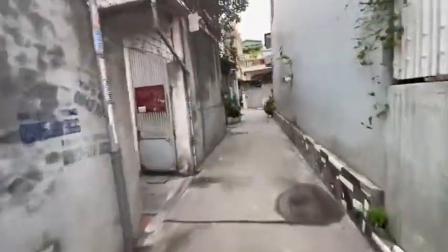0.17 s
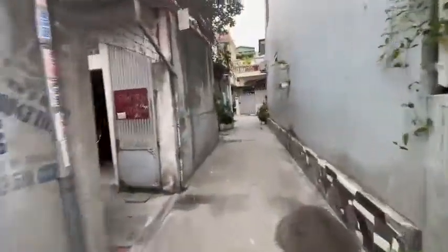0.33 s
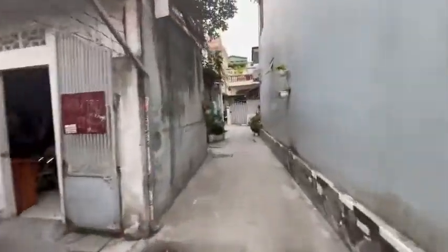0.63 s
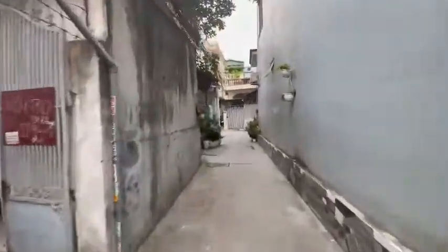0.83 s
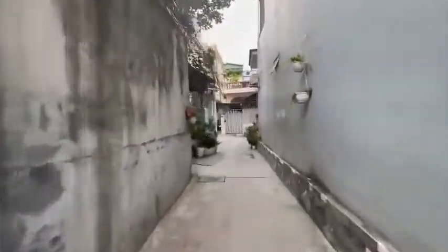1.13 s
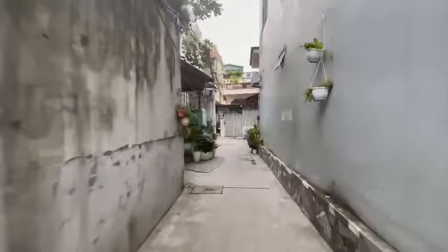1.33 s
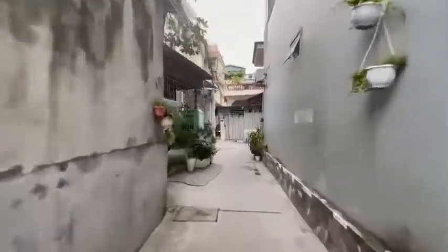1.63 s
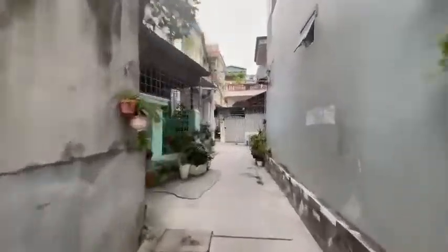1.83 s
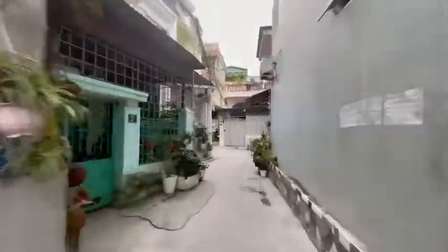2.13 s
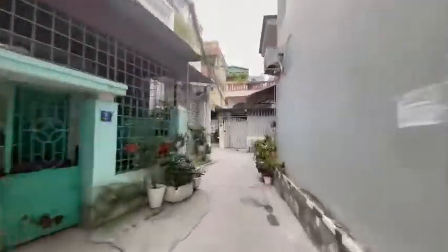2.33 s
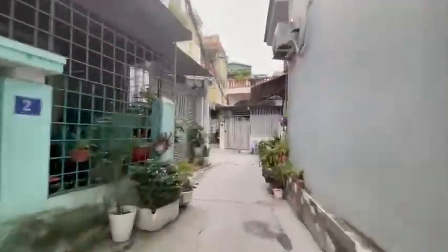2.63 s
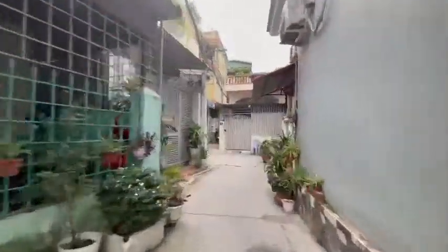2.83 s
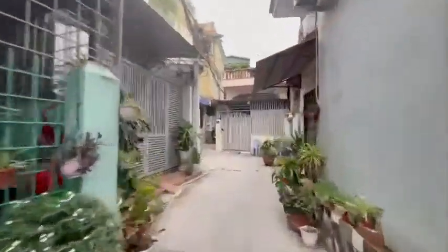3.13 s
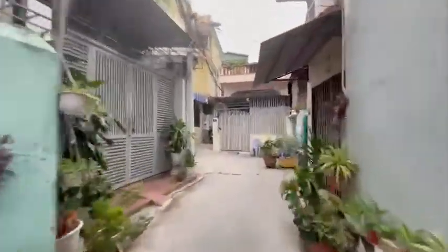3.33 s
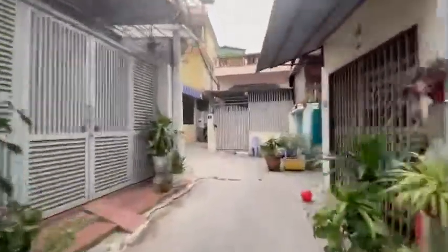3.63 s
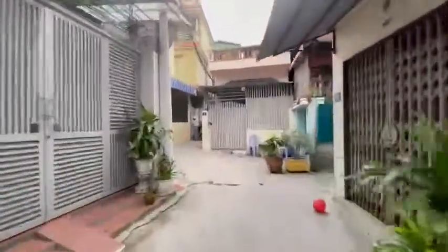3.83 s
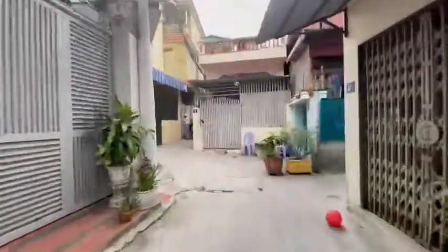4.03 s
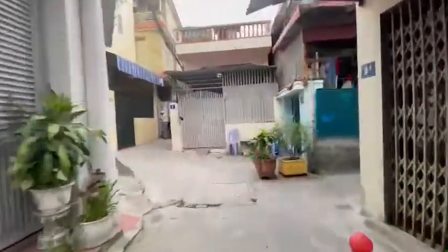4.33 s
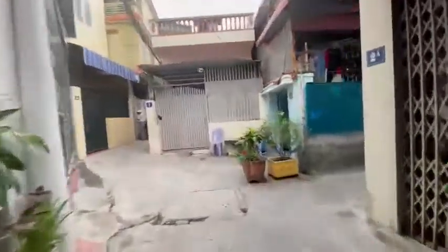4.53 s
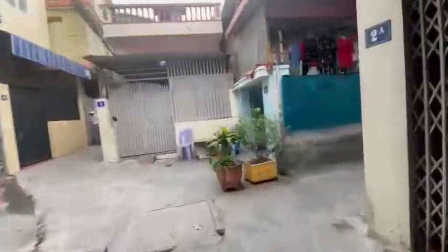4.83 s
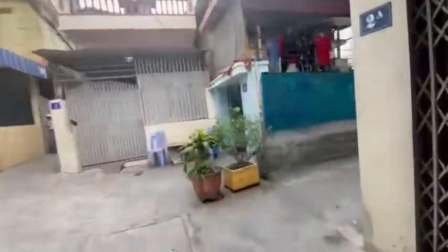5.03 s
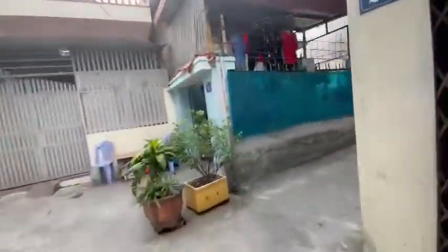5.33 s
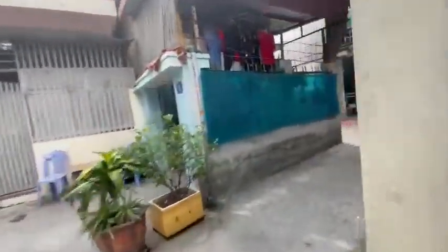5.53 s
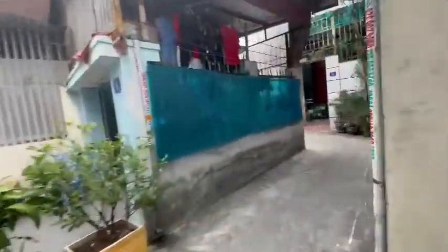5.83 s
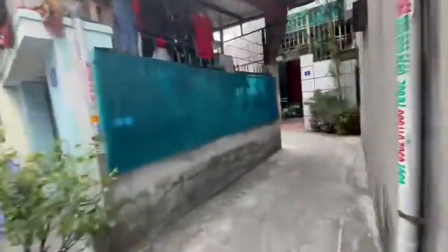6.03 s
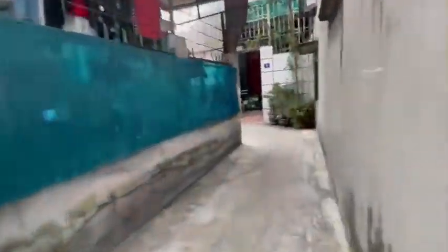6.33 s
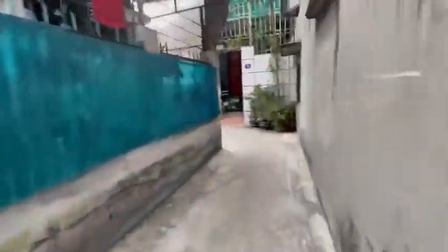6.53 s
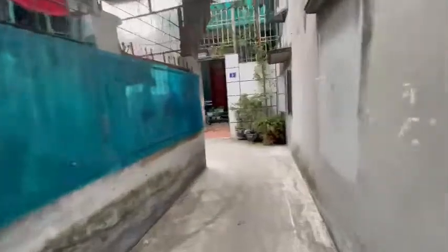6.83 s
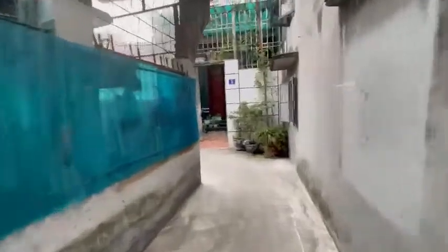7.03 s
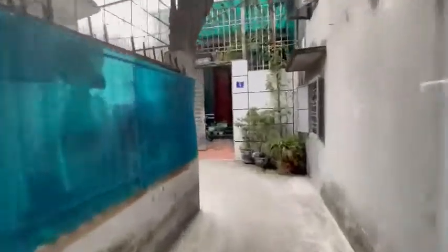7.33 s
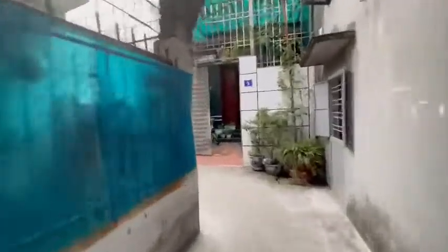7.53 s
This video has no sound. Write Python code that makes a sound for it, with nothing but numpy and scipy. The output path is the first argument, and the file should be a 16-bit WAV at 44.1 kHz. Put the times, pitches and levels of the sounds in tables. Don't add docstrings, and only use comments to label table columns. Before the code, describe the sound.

Small single-cylinder engine cruising, slowing to separate echoing pops, then revving up again and fading, with valve clatter, tyre hiss and bird chirps.

```python
import sys
import numpy as np
from scipy import signal
from scipy.fft import rfft, irfft, next_fast_len
from scipy.io import wavfile
from scipy.ndimage import uniform_filter1d

SR = 44100
rng = np.random.default_rng(int(sys.argv[2]) if len(sys.argv) > 2 else 0)


def dump(signal):
    limited = np.clip(np.atleast_2d(signal).T, -1, 1)
    pcm = np.round(limited * 32767).astype(np.int16)
    wavfile.write(sys.argv[1], SR, pcm)


def gain_from_decibels(decibels):
    exponent = np.asarray(decibels, float) / 20
    return 10 ** exponent


N = 338247


def evened(x):
    return x / np.sqrt(np.mean(x ** 2) + 1e-20)


def steady(x):
    return x / np.sqrt(uniform_filter1d(x ** 2, size=SR // 2))


def read(points, hz):
    f, value = np.transpose(points)
    return np.interp(np.log(hz + 1), np.log(f + 1), value)


def curves(rows):
    s, *columns = np.transpose(rows)
    return [np.interp(np.arange(N) / SR, s, column) for column in columns]


def add(mix, s, sound):
    part = mix[..., round(s * SR):][..., :sound.shape[-1]]
    part += sound[..., :part.shape[-1]]


def resonate(x, hz, width):
    turn = np.exp(2j * np.pi * np.cumsum(hz * np.ones(N)) / SR)
    r = np.exp(-np.pi * width / SR)
    return 2 * (turn * signal.lfilter([1 - r], [1, -r], x / turn)).real


def slow(hz):
    points = rng.standard_normal(N // 100)
    return evened(np.interp(np.arange(N) * hz / SR, np.arange(N // 100), points))


def noise(spectrum, patchy_db):
    a, b, c, d, patches = rng.standard_normal((N // 256 + 5, 513, 5)).T
    patches = uniform_filter1d(patches, size=8, axis=0)
    patches = evened(uniform_filter1d(patches, size=14, axis=1))
    colour_db = read(spectrum, np.fft.rfftfreq(1024, 1 / SR))[:, None]
    frames = np.array([a + 1j * b, c + 1j * d]) * gain_from_decibels(colour_db + patchy_db * patches)
    return evened(signal.istft(frames, nperseg=1024, noverlap=768)[1][:, :N])


def lane(x, t60):
    t = np.arange(SR // 2) / SR
    signs = rng.choice([-1., 1.], (len(t), 3)).T
    taps = signs * (rng.random((len(t), 3)).T < .05) * gain_from_decibels(-60 * t / t60)
    taps = taps / np.linalg.norm(taps, axis=1)[:, None]
    turn = np.arange(N) / SR * 2.222 + np.arange(3)[:, None] * np.pi / 3
    out = signal.fftconvolve(x * np.cos(turn), taps, axes=1)
    return out.sum(0)[:N] * np.sqrt(2 / 3)


# order, width/share of note, level/dB
CROSS_MODES = [
    (1, 0.2, 0.14),
    (2, 0.17, -7),
]


def walls(hz, width_m):
    first_hz = 343 / (2 * width_m)
    power = gain_from_decibels(2 * -11)
    for k, share, db in CROSS_MODES:
        power = power + gain_from_decibels(2 * db) / (1 + ((hz / (k * first_hz) - 1) / share) ** 2) ** 2
    return 10 * np.log10(power)


# t/s, firings per second
SPEED = [(0.0, 30.6), (0.25, 30.82), (2.13, 30.9), (2.34, 28.91), (2.82, 18.21), (3.23, 14.68),
         (3.81, 13.39), (4.94, 13.1), (5.2, 12.55), (5.35, 13.56), (5.81, 25.35), (6.2, 31.82),
         (6.69, 34.3), (6.9, 33.78), (7.04, 31.77), (7.27, 25.02), (7.67, 17.52)]


def engine_speed():
    return curves(SPEED)[0]


def firings(turns, spread_db):
    at = np.flatnonzero(np.diff(np.floor(turns)))
    clicks = np.zeros(N)
    clicks[at] = gain_from_decibels(spread_db * rng.standard_normal(400)[:len(at)])
    return clicks


# t/s, silencer ring with throttle level/dB, boom from the walls level/dB, lane width/m
RIDE = [(0.0, -22.5, -19.5, 2.46), (0.45, -22.5, -20, 2.8), (0.75, -17.5, -17.5, 2.94),
        (1.2, -24.5, -24.5, 2.53), (1.75, -17, -22, 2.77), (2.15, -22.5, -20.5, 3.2),
        (2.42, -31, -16, 1.96), (2.72, -39, -21, 1.83), (2.84, -35, -24.5, 2.4), (4.1, -35, -25.5, 2.85),
        (4.6, -40, -28.5, 3.1), (5.6, -38.5, -24, 3.45), (5.92, -34, -19.5, 3.13), (6.24, -23, -21, 3),
        (6.74, -28.5, -19.5, 2.5), (6.95, -23, -16, 2.6), (7.2, -30.5, -13.5, 3.2), (7.67, -56, -17.5, 4.2)]
# delay t/s, level/dB, unevenness/dB
ECHOES = [
    (0, 0, 1.3),
    (.016, -3, 2.),
    (.033, -15, 3.),
    (.047, -18, 3.),
]
# f/Hz, width/Hz, level/dB
SILENCER = [
    (249, 240, -8),
    (332, 43, 1.5),
    (438, 170, 0),
]


def exhaust(turns, rate, loaded):
    ring_db, boom_db, width_m = curves(RIDE)
    lumpy_s, lumpy_length_s, lumpy_db = 3.55, 0.4, 3
    lumpy = np.exp(-.5 * ((np.arange(N) / SR - lumpy_s) / lumpy_length_s) ** 2)
    pop_db = boom_db - lumpy_db * lumpy * (1 + np.cos(np.pi * turns - .4))
    low_db = pop_db + 0.7 + 0.63 * walls(61.4, width_m)
    high_db = pop_db + 12 + 1.9 * walls(116.4, width_m)
    clicks = np.zeros(N)
    for delay, db, spread_db in ECHOES:
        add(clicks, delay, gain_from_decibels(db) * firings(turns, spread_db))
    t, pops = np.arange(-1500, 1501) / SR, 0
    for hz, length, lag, db in [(62, 0.0042, 0.0056, low_db), (114, 0.0066, 0, high_db)]:
        pop = np.cos(2 * np.pi * hz * t - .6) * np.exp(-.5 * ((t - lag) / length) ** 2)
        pops = pops + gain_from_decibels(db) * evened(signal.oaconvolve(clicks, pop, "same") / np.sqrt(rate))

    slide = np.cos(2 * np.pi * (335 * t + 3400 * t ** 2)) * np.exp(-.5 * (t / 0.0058) ** 2)
    whoops = steady(signal.oaconvolve(firings(turns - .2, 1.0), slide, "same"))
    puffs = rng.standard_normal(N) * (.5 + np.exp(-(turns % 1) / 0.87))
    roar = 0
    for k, (hz, width, db) in enumerate(SILENCER):
        chamber = evened(resonate(resonate(puffs, hz, width), hz, 1.6 * width))
        roar = roar + (-1) ** k * gain_from_decibels(db) * chamber
    ring = steady(loaded * (whoops + 0.47 * lane(whoops, t60=0.35)) + 0.37 * evened(roar))

    pipe_rate, pipe_rate_width = 19.3, 2.47
    sweep = np.exp(-.5 * ((rate - pipe_rate) / pipe_rate_width) ** 2)
    pipe_gain = gain_from_decibels(boom_db - 17) + gain_from_decibels(-23) * sweep
    pipe = steady(resonate(resonate(evened(clicks) + 0.56 * puffs, 205, 95), 211, 120))
    return np.sqrt(1 - loaded ** 2) * pops + gain_from_decibels(-4.5) * pipe_gain * pipe + gain_from_decibels(ring_db + 1) * ring


# multiple of the firing rate, level/dB, change when the throttle shuts/dB
ORDERS = [
    (1, -1, -4),
    (2, -0.25, -5),
    (3, -7.5, 7),
    (4, -0.5, 2.5),
    (5, 5, -2.5),
    (6, -2.5, 0.5),
]
# f/Hz, level/dB
TAILPIPE = [(30, -3), (48, -8), (62, 0.7), (100, 1.1), (135, 2.5), (155, -1), (172, -7.5), (210, -1)]


def crank(turns, rate):
    boom_db, width_m = curves(RIDE)[1:]
    slowing = uniform_filter1d(-np.gradient(rate) * SR, size=SR // 6)
    overrun = np.clip(slowing / 25, 0, 1)
    spread = 0.62 * np.clip((rate - 27) / 3, 0, 1)
    throb = 0
    for k, db, overrun_db in ORDERS:
        level_db = boom_db + db + overrun_db * overrun
        level_db = level_db + walls(k * rate, width_m) + read(TAILPIPE, k * rate) + 1.8 * slow(hz=8)
        drift = np.array([.16 * slow(hz=9), 2.1 * slow(hz=3)])
        angle = 2 * np.pi * k * turns - .6 + spread * (k - 3) ** 2 + drift
        throb = throb + np.sqrt(2) * gain_from_decibels(level_db) * np.cos(angle)
    return throb


# t/s, level/dB
ROLLING = [(0.0, -28), (0.65, -27), (1.1, -29), (1.9, -27.5), (2.43, -30), (3.03, -36.5), (4.2, -37.5),
           (5.3, -38), (5.42, -33.5), (5.68, -32.5), (5.9, -30), (6.2, -29.5), (6.4, -30.5), (6.92, -24.5),
           (7.3, -30), (7.67, -33.5)]
# f/Hz, level/dB per Hz
CLATTER = [(30, -6.5), (60, 9.5), (150, 3.5), (220, -1), (350, 2.5), (500, 1), (850, -1.5), (1300, -0.5),
           (2000, -5), (2400, -11), (3100, -9.5), (3600, -15.5), (5000, -19.5), (9000, -62)]
# f/Hz, level/dB per Hz
HISS = [(2500, 0.5), (3600, -21), (5200, 5), (6500, 3.5), (7500, -1), (8900, 3), (10000, -1), (10900, -6.5),
        (11600, -19), (12000, -42), (12900, -46), (15500, -44)]
# f/Hz, width/Hz, level/dB
CASING = [
    (703, 7.2, -8),
    (1350, 12, -11),
    (1563, 39, -5),
    (2830, 340, -10),
]
# t/s, f/Hz, waver/share of note, level/dB
COVER = [
    (0, 1097, .002, -7),
    (1.1, 1101, .002, -9.5),
    (1.3, 1104, .001, -5),
    (2.0, 1104, .001, -9.5),
    (2.5, 1102, 0.0046, -14),
    (3.2, 980, 0.026, -28),
    (5.3, 970, 0.021, -11),
    (6.1, 987, .06, -6.5),
    (7.0, 997, 0.059, -7.5),
    (7.67, 1000, .03, -13),
]


def running(turns):
    clatter_db = curves(ROLLING)[0]
    gritty = np.clip((np.arange(N) / SR - 5.4) / .05, 0, 1)
    hiss_db = -41.5 + 1.07 * (clatter_db + 28.5) + gritty
    ring_db = -6.5 - 0.27 * (clatter_db + 29.5)
    beat = np.exp(-(2 * turns % 1) / 0.15)
    drive = rng.standard_normal((N, 2)).T * (1 + 0.3 * beat)
    cover_hz, waver, cover_db = curves(COVER)
    cover_db = cover_db + 0.5 * slow(hz=5.53)
    cover_hz = cover_hz * (1 + waver * slow(hz=109.8))
    cover = evened(resonate(resonate(drive, cover_hz, 28), cover_hz, 99))
    rings = gain_from_decibels(cover_db - ring_db + 2.5) * cover
    for hz, width, db in CASING:
        casing = evened(resonate(drive, hz * (1 + 0.006 * slow(hz=5)), width))
        rings += gain_from_decibels(db + 2.5 * slow(hz=4)) * casing
    clatter = noise(CLATTER, patchy_db=1.5) * (1 + 0.19 * beat) + gain_from_decibels(ring_db - 2.5) * rings
    hiss = noise(HISS, patchy_db=1.5) * (1 + 0.42 * beat)
    return gain_from_decibels(clatter_db + 7) * clatter + gain_from_decibels(hiss_db + 5.0) * hiss


# t/s, level/dB, low f/Hz, high f/Hz, time to fall 60 dB/s
RATTLES = [
    (.53, -27, 7200, 12800, 0.42),
    (5.416, -25, 4500, 15500, 0.068),
    (5.418, -24, 5000, 10300, 0.28),
    (5.75, -36, 7000, 13000, 0.46),
    (6.135, -30, 7000, 13000, .15),
    (6.246, -20, 1000, 6400, 0.12),
    (6.24, -10.5, 200, 900, 0.17),
]


def rattles():
    out, t = np.zeros((2, N)), np.arange(SR // 3) / SR
    for s, db, low_hz, high_hz, t60 in RATTLES:
        band = signal.butter(2, [low_hz, high_hz], "bandpass", fs=SR, output="sos")
        burst = evened(signal.sosfilt(band, rng.standard_normal((len(t), 2)).T))
        rise = np.minimum(t / (0.05 * t60), 1)
        add(out, s, gain_from_decibels(db - 60 * t / t60) * rise * burst)
    return out


# t/s, level/dB, start f/Hz, end f/Hz, length/s
CHIRPS = [
    (0.612, -23, 6490, 6230, 0.098),
    (3.961, -29.5, 6450, 6280, 0.114),
]


def bird():
    out = np.zeros(N)
    for s, db, start_hz, end_hz, length in CHIRPS:
        t = np.arange(0, length, 1 / SR)
        angle = 2 * np.pi * np.cumsum(start_hz + (end_hz - start_hz) * (t / length) ** 2) / SR
        rasp = 1 + .3 * evened(uniform_filter1d(rng.standard_normal(SR), size=70))[:len(t)]
        fade = signal.windows.tukey(len(t), .4) * gain_from_decibels(-60 * t)
        add(out, s, gain_from_decibels(db) * rasp * fade * (np.sin(angle) + .03 * np.sin(2 * angle)))
    return 1.4 * out + gain_from_decibels(3.0) * np.array([lane(out, t60=0.82), lane(out, t60=0.66)])


# t/s, length/s, start f/Hz, end f/Hz, level/dB
WHINES = [
    (3, 0.28, 520, 850, -33),
    (3.75, 0.22, 770, 870, -35),
    (4.445, 0.42, 700, 600, -40),
    (4.598, 0.91, 1300, 1567, -37.5),
    (6.889, 0.17, 1200, 690, -24),
    (7.109, 0.99, 710, 700, -33.5),
    (5.418, 0.11, 6100, 6600, -38),
    (5.413, 0.116, 5700, 4600, -40),
    (2, 0.055, 8900, 8900, -40),
]


def whines():
    out = np.zeros((2, N))
    for s, length, start_hz, end_hz, db in WHINES:
        width = 38 + 0.25 * abs(end_hz - start_hz) + 4 / length
        t = np.arange(0, length, 1 / SR)
        shake = uniform_filter1d(rng.standard_normal((SR, 2, 2)), round(SR / width), axis=0)[:len(t)].T
        angle = 2 * np.pi * np.cumsum(start_hz + (end_hz - start_hz) * t / length) / SR
        whine = evened(shake[0] * np.cos(angle) + shake[1] * np.sin(angle))
        add(out, s, gain_from_decibels(db) * whine * signal.windows.tukey(len(t), .6))
    return out


# (f/Hz, time to fall 60 dB/s, level/dB)
SNAP = (6.2444, -9.5, [(1200, .014, 3), (1900, .012, 1), (2500, .01, -1.5), (3100, .01, -2),
        (3700, 0.008, -4), (4400, .008, -4), (5200, 0.008, -3), (6000, .006, -6)])


def snap():
    s, db, modes = SNAP
    t, out, hit = np.arange(3000) / SR, np.zeros((2, N)), 0
    for hz, t60, mode_db in modes:
        hit = hit + gain_from_decibels(db + mode_db - 60 * t / t60) * np.sin(2 * np.pi * hz * t)
    add(out, s, hit * np.minimum(t / 0.00073, 1))
    return out


def scene():
    rate = engine_speed()
    turns = np.cumsum(rate) / SR
    loaded = np.clip((rate - 15) / 7, 0, 1)
    pipe = exhaust(turns, rate, loaded)
    engine = np.array([pipe, lane(pipe, t60=0.13)]) + loaded * crank(turns, rate) + running(turns)
    return engine + rattles() + bird() + whines() + snap()


def band_limit(x):
    return signal.sosfilt(signal.butter(12, 12830, fs=SR, output="sos"), x)


# f/Hz, likeness 0-1
SAME = [(60, .75), (350, .85), (550, .55), (1500, .5), (2200, .35), (3000, .5), (4000, .2), (7600, .25),
        (8300, .72), (9300, .88), (10450, 1), (11000, .6), (11700, .9), (12900, .5)]
# f/Hz, lead/radians
LEAD = [(0, 0), (430, -1.3), (690, -3.3), (1810, -3.9), (2580, -6.0), (3270, -6.9), (6120, -17.7),
        (7500, -21.2), (8100, -19.3), (8790, -18.7), (10330, -15.75), (10600, -15.5), (11500, -13.8),
        (13000, -13.7)]
# f/Hz, level/dB
TILT = [(60, -.4), (150, -2), (350, -3.3), (680, -8.5), (1100, -4.5), (2000, -6), (3000, -5), (4200, -2),
        (6000, -3), (7500, .3), (12000, 0)]


def record(dry):
    size = next_fast_len(N + 4096)
    hz = np.fft.rfftfreq(size, 1 / SR)
    right, twin = rfft(dry, size, axis=1)
    same = np.clip(read(SAME, hz), 0, 1)
    lead = np.interp(hz, *np.transpose(LEAD))
    left = same * right + np.sqrt(1 - same ** 2) * twin
    left = left * np.exp(1j * lead) * gain_from_decibels(read(TILT, hz))
    low_cut = 1 / np.sqrt(1 + (42 / (hz + 1)) ** 6)
    stereo = irfft(np.array([left, right]) * low_cut, size, axis=1)[:, :N]
    return band_limit(stereo)


dry = scene()
out = record(dry)
dump(out)
```